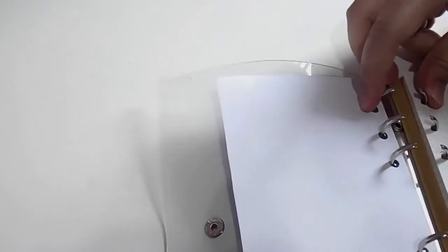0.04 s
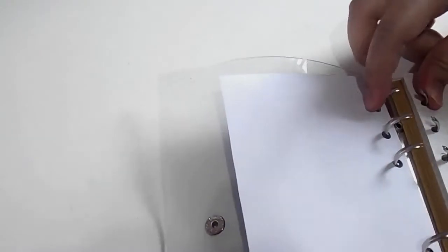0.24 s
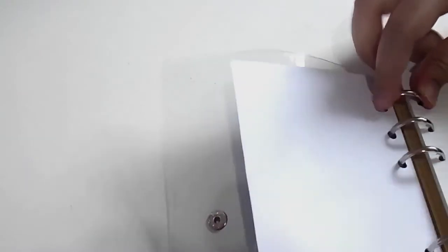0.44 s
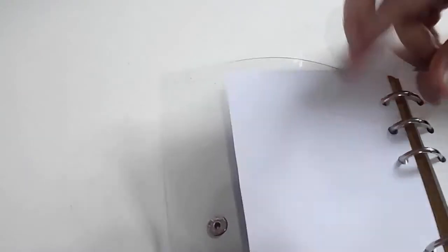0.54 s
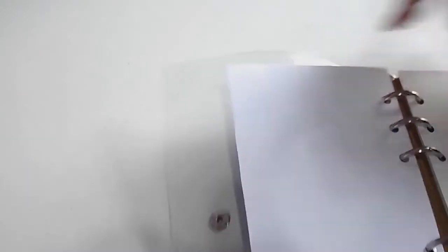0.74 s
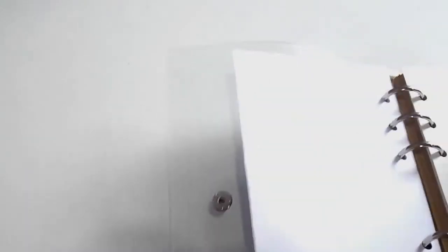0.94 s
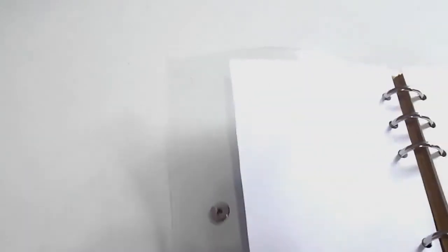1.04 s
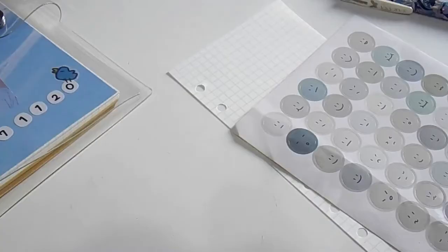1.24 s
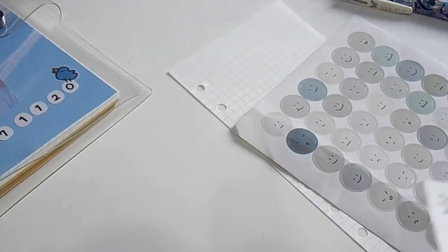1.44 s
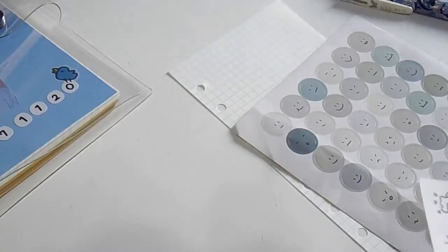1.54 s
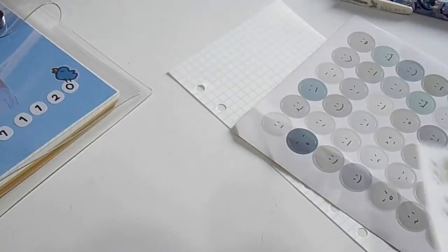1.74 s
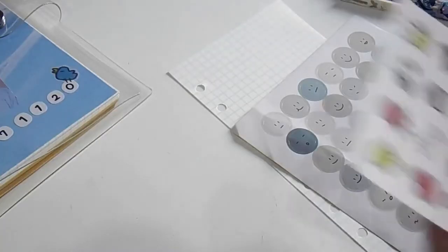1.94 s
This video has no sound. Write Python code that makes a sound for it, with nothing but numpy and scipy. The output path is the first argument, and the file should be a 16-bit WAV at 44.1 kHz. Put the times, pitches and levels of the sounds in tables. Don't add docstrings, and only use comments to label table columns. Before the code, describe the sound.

A steel ring binder snaps shut with a loud sharp metallic crack in a small hard room

```python
import sys
import numpy as np
from scipy import signal
from scipy.fft import rfft, irfft, next_fast_len
from scipy.io import wavfile
from scipy.ndimage import uniform_filter1d, map_coordinates

SR = 44100
rng = np.random.default_rng(int(sys.argv[2]) if len(sys.argv) > 2 else 0)


def unload_audio(sound):
    columns = np.transpose(np.atleast_2d(sound))
    steps = np.round(np.clip(columns, -1, 1) * 32767)
    wavfile.write(sys.argv[1], SR, steps.astype(np.int16))


def volts_from_decibels(level):
    exponent = np.asarray(level, float) / 20
    return 10 ** exponent


N = 88200

# pitch_hz, level_db (per Hz)
AIR_COLOUR = [(20, -41.5), (70, -29), (105, -15.5), (230, -17), (500, -8), (2550, -17.5), (11300, -25),
              (16000, -30)]
# time_s, level_db
AIR_SWELL = [(0, 1.5), (.8, 1.5), (1.17, 1), (1.2, 0.5), (1.65, 1.5), (2, 3.5)]
# pitch_hz, t60_s (time to fall 60 dB)
ROOM_RING = [(100, 0.33), (300, .45), (1000, 0.43), (2000, .52), (3000, 0.42), (6000, 0.42), (10000, 0.33),
             (15000, 0.37)]
# peak_s, rise_s, fall_s
STROKES = [
    (.045, .025, .025),
    (1.018, .02, .007),
    (1.15, .12, .035),
    (1.152, .1, .03),
    (1.16, .09, .012),
    (1.412, .02, .01),
    (1.4125, .007, .009),
    (1.8, .06, .3),
]
# level_db, pitch_hz
STROKE_SOUNDS = [(-71, 2400), (-60, 7900), (-60, 2550), (-61.5, 4900), (-59, 10000), (-52, 3400),
                 (-49.5, 11000), (-76, 1130)]
# start_s, level_db, pitch_hz, width_hz, t60_s
TAPS = [(.925, -43.5, 1100, 600, 0.065), (.9252, -51, 3530, 5960, 0.029), (0.931, -52.5, 453, 300, 0.047),
        (0.995, -53, 2500, 2500, .02), (1.0, -63, 6950, 7000, 0.014), (1.389, -49, 1240, 920, 0.063),
        (1.3893, -49.5, 5500, 10880, .03), (1.547, -59, 685, 894, 0.025), (1.737, -50.5, 1400, 1800, 0.087),
        (1.7371, -52.5, 3960, 5460, .045), (1.849, -54, 11180, 11000, 0.011),
        (1.976, -46, 5380, 2500, .012), (1.9752, -50, 12460, 3030, .01), (1.9754, -51.5, 1620, 1810, 0.024)]
# start_s, level_db, crack_db
CONTACTS = [
    (.2037, -5, -4),
    (.20625, -7, 0),
    (.20658, 2, -8),
    (.20694, 2, -12),
]
# start_s, level_db
ECHOES = [(.2088, -16), (.2099, -14), (.2113, -11), (.2132, -16), (.2148, -7), (.2165, -10), (.2174, -9),
          (.2192, -1), (.2216, -12), (.2262, -9), (.2276, -5), (.2295, -10), (.2343, -5), (.2405, -11),
          (.2432, -8)]
# pitch_hz, width_hz, level_db
STEEL = [(175, 41, -13.5), (312, 80, -11), (520, 300, -13.5), (957, 490, -5.5), (1400, 1500, -14.5),
         (2418, 500, -6.5), (2880, 800, 3), (3260, 240, -1), (4600, 900, -10.5), (5835, 1700, -7.5),
         (9000, 5000, -13), (13710, 11000, -20.5)]

MAIN_SNAP_S = CONTACTS[1][0]


def unit(x):
    return x / np.sqrt(np.mean(x ** 2) + 1e-20)


def along(points, hz):
    f, v = np.transpose(points)
    return np.interp(np.log(hz + 1), np.log(f + 1), v)


def wobble(rate):
    knots = rng.standard_normal(int(N * rate / SR) + 4)
    return map_coordinates(knots, [np.arange(N) * rate / SR])


def filtered(x, response):
    m = 2 * next_fast_len(len(x) // 2 + SR // 8)
    return irfft(rfft(x, m) * response(np.fft.rfftfreq(m, 1 / SR)), m)[:len(x)]


def peak(f, hz, width):
    return 1j * f * width / (hz * hz - f * f + 1j * f * width)


def blows(rows):
    return lambda f: sum(volts_from_decibels(db) * np.exp(-2j * np.pi * f * s) for s, db in rows)


def puffs(rows, t60):
    t = np.arange(N) / SR
    envelope = sum(volts_from_decibels(db - 60 * np.abs(t - s) / t60) * (t >= s) for s, db in rows)
    return rng.standard_normal(N) * envelope


def causal(gain):
    cepstrum = irfft(np.log(gain + 1e-6))
    half = len(cepstrum) // 2
    folded = np.concatenate([cepstrum[:1], 2 * cepstrum[1:half], np.zeros(len(cepstrum) - half)])
    return np.exp(rfft(folded))


def air():
    z = signal.stft(rng.standard_normal(N), nperseg=512)[2]
    across_pitch = uniform_filter1d(rng.standard_normal(z.shape), 6, 0)
    patches = uniform_filter1d(across_pitch, 12, 1)
    noise = signal.istft(z * volts_from_decibels(.8 * unit(patches)), nperseg=512)[1][:N]
    coloured = unit(filtered(noise, lambda f: volts_from_decibels(along(AIR_COLOUR, f))))
    swell_db = np.interp(np.arange(N) / SR, *np.transpose(AIR_SWELL))
    return volts_from_decibels(-60.5 + swell_db + 0.24 * wobble(2.7)) * coloured


def shudder():
    level_db, pitch_hz, t60_s = -70.5, 65, 0.33
    t = np.arange(N) / SR - MAIN_SNAP_S
    low = unit(filtered(rng.standard_normal(N), lambda f: peak(f, pitch_hz, 50) ** 2))
    return volts_from_decibels(level_db - 60 * np.abs(t) / t60_s) * (t > 0) * low


def room(x, rise_s):
    late_db, late_longer = -26.5, 2.35
    hz, t, z = signal.stft(rng.standard_normal(SR), SR, nperseg=256)
    fall_db = -60 * t / along(ROOM_RING, hz)[:, None]
    fade = volts_from_decibels(fall_db) + volts_from_decibels(late_db + fall_db / late_longer)
    tail = signal.istft(z * fade, SR, nperseg=256)[1]
    tail = tail * (1 - np.exp(-(np.arange(len(tail)) / SR / rise_s) ** 2))
    return signal.fftconvolve(x, tail / np.linalg.norm(tail))[:N]


def slides():
    sharpness, grain_db = 1.3, 0.5
    t, out = np.arange(N) / SR, np.zeros(N)
    for (top, rise, fall), (db, hz) in zip(STROKES, STROKE_SOUNDS):
        grains = rng.standard_normal(N) * volts_from_decibels(grain_db * wobble(400) + 1.5 * wobble(50))
        stroke = np.interp(t, [top - rise, top, top + fall], [0, 1, 0])
        friction = unit(filtered(grains, lambda f: peak(f, hz, hz / sharpness) ** 2))
        out += volts_from_decibels(db) * stroke * friction
    return out


def taps():
    out, t = np.zeros(N + SR), np.arange(SR // 8) / SR
    for s, db, hz, width, t60 in TAPS:
        puff = unit(filtered(rng.standard_normal(len(t)), lambda f: peak(f, hz, width) ** 2))
        out[round(s * SR):][:len(t)] += volts_from_decibels(db - 60 * t / t60) * puff
    return out[:N]


def steel(f):
    low_cut_hz = 250
    power = sum(volts_from_decibels(2 * db) * np.abs(peak(f, hz, w)) ** 4 for hz, w, db in STEEL)
    bass_cut = (1 + (low_cut_hz / (f + 1)) ** 8) ** .5
    return 8 * causal(power ** .5 / bass_cut)


def direct_snap(click):
    hits = blows([(s, db) for s, db, _ in CONTACTS])
    ring = filtered(click, lambda f: steel(f) * hits(f))
    crack_noise = puffs([(s, crack_db) for s, _, crack_db in CONTACTS], .007)
    return ring + .5 * filtered(crack_noise, lambda f: peak(f, 11500, 14000))


def snap_echoes(click):
    dull_hz, scatter_db, scatter_t60_s = 6000, -17, .015
    returns = blows(ECHOES)

    def surface(f):
        dull = 1 / (1 + 1j * f / dull_hz) ** 2
        doubled = 1.2 + np.exp(-2j * np.pi * f * .00034)
        return steel(f) * returns(f) * dull * doubled

    scatter = volts_from_decibels(scatter_db) * filtered(puffs(ECHOES, scatter_t60_s), steel)
    return filtered(click, surface) + scatter


def cover_thud(click):
    start_s, level_db, pitch_hz, width_hz = .2145, 25, 440, 117.5
    return filtered(click, lambda f: blows([(start_s, level_db)])(f) * peak(f, pitch_hz, width_hz) ** 2)


def snap():
    click = np.eye(1, N)[0]
    into_room = filtered(click, lambda f: steel(f) * blows([(MAIN_SNAP_S, 11.5)])(f))
    return direct_snap(click) + snap_echoes(click) + cover_thud(click) + room(into_room, 0.028)


def scene():
    small = taps() + slides()
    small_room = volts_from_decibels(-8) * room(small, .008)
    return (air() + shudder() + small + small_room + snap())[None]


def band_limit(x):
    return signal.sosfilt(signal.butter(12, 16180, fs=SR, output="sos"), x)


def record(dry):
    clip_top, clip_hard = 1.0, 18
    hush_start_s, hush_end_s, hush_hz = .187, .2005, 900
    top_hz = 15800
    x = dry[0] / (1 + np.abs(dry[0] / clip_top) ** clip_hard) ** (1 / clip_hard)
    t = np.arange(N) / SR
    hush = uniform_filter1d(1. * (t > hush_start_s) * (t < hush_end_s), size=60)
    before_snap = x * (t < hush_end_s + .002)
    treble = filtered(before_snap, lambda f: 1 / (1 + (hush_hz / (f + 1)) ** 8))
    x = filtered(x - hush * treble, lambda f: 1 / (1 + (f / top_hz) ** 40))
    return band_limit(x[None])


dry = scene()
out = record(dry)
unload_audio(out)
```